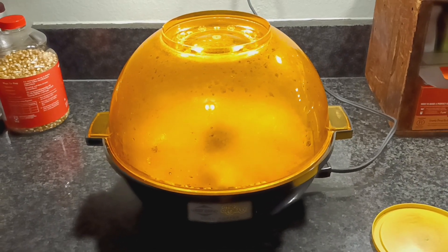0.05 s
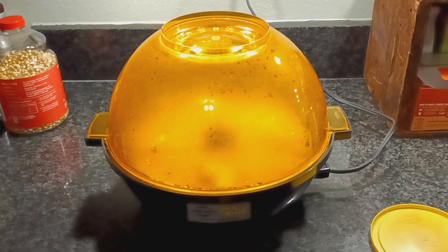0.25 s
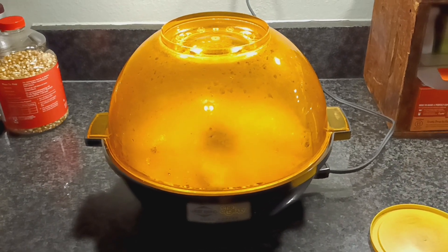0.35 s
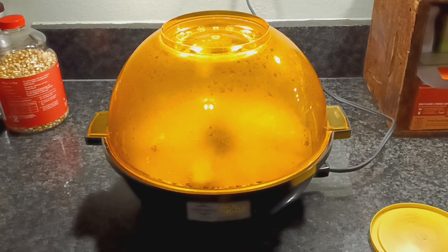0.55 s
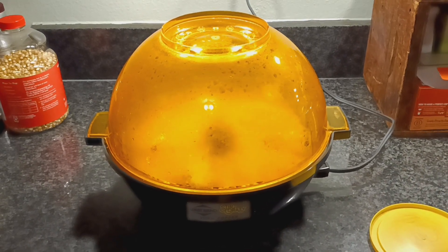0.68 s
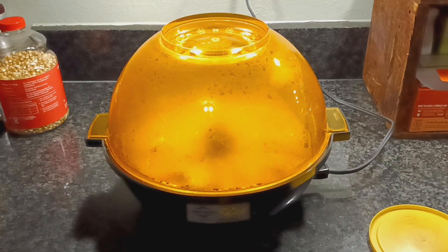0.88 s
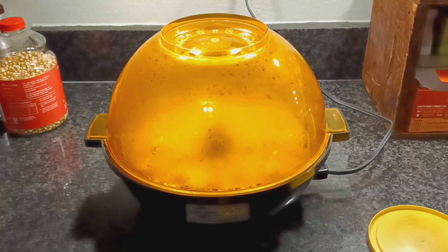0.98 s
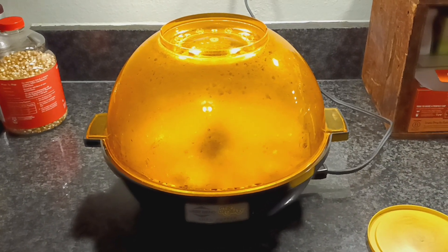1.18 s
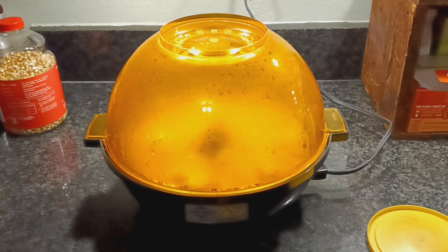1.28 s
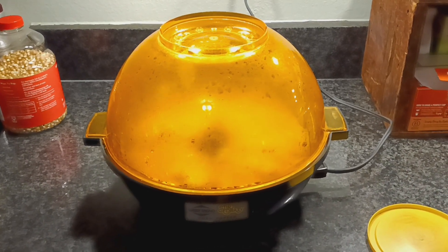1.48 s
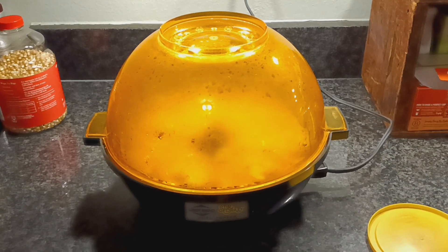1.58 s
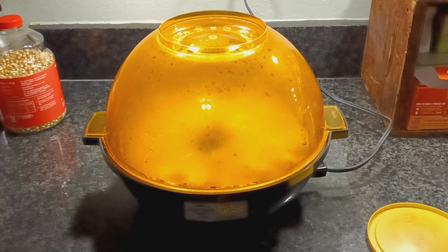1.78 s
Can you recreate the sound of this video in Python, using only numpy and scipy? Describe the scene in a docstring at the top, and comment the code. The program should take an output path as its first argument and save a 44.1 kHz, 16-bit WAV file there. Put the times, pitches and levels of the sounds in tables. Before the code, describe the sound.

Popcorn pops sharply and kernels clatter against a hollow plastic dome over a low motor hum

```python
"""Popcorn pops in an electric popper on a kitchen counter, heard close by on two unlike microphones.
Hulls burst as bright noise snaps that ring the air under the plastic dome; the kitchen answers.
Flying kernels knock the dome (noise clacks and ringing modes) and click on the hot plate.
Low noise puffs shove the ringing housing; the stirring motor rumbles and hums, and the oil hisses.
The recorder turns itself down for loud sounds and recovers slowly."""
import sys
import numpy as np
from scipy import signal
from scipy.fft import rfft, irfft
from scipy.io import wavfile
from scipy.ndimage import uniform_filter1d

SR = 44100
rng = np.random.default_rng(int(sys.argv[2]) if len(sys.argv) > 2 else 0)


def dump(signal):
    """Clip the signal to [-1, 1] and save it as 16-bit WAV at the path in sys.argv[1]."""
    limited = np.clip(np.atleast_2d(signal).T, -1, 1)
    pcm = np.round(limited * 32767).astype(np.int16)
    wavfile.write(sys.argv[1], SR, pcm)


N = 81585
TIME = np.arange(N) / SR
FFT_SIZE = 2 ** 17
FREQS = np.maximum(np.fft.rfftfreq(FFT_SIZE, 1 / SR), 1)
CUTOFF_HZ = 15800   # top of the recorded band
PIVOT_HZ = 1680     # parts the dome's low modes from its high ones

# Kernels strike the dome. Each row: start in seconds, level in dB, brightness in dB per octave,
# swell in seconds, level of the low modes in dB, level of the high modes in dB.
KNOCKS = [(0.206, -36.5, 1.5, 0.003, 4, -16), (0.377, -19.5, 3.5, 0.001, -5, -15),
          (.386, -21.5, -0.5, 0.013, 7, 5), (0.499, -25.5, -6.5, 0.0099, 6, 3.5),
          (.527, -35, -6, 0.0074, 10, 4), (0.564, -20, -1.5, 0.016, -5, -7),
          (0.611, -30.5, 14, 0.0013, -5, -10), (0.642, -12.5, 0, 0.001, 6, -8),
          (0.659, -15.5, 0, 0.018, 8, 6), (0.751, -18, -2.5, 0.0017, 9.5, -4),
          (0.781, -29, -18.5, 0.0017, -28, 4), (1.023, -20.5, 3.5, 0.002, -2, 0.5),
          (1.098, -26.5, -9, 0.009, 8, -1.5), (1.153, -31, -5, 0.0088, -10, -2),
          (1.3098, -15, 3.5, 0.0031, 8.5, 5.5), (1.373, -17, 4.5, 0.0018, -7, -4),
          (1.387, -14, -8, 0.0061, -28, 5.5), (1.431, -22, 1, 0.0017, 6, 10.5),
          (1.477, -15.5, -6, 0.00056, -20, -5), (1.544, -29.5, 3, 0.0008, 6, -11)]


def from_db(db):
    """Decibels to gain."""
    return 10 ** (np.asarray(db) / 20)


def rms_one(x):
    """Scale to rms 1."""
    return x / np.sqrt(np.mean(x ** 2) + 1e-20)


def at_hz(points):
    """Read a table along the log-frequency axis."""
    hz, value = np.transpose(points)
    return np.interp(np.log(FREQS), np.log(hz), value)


def filtered(x, response):
    """Apply a frequency response."""
    return irfft(rfft(x, FFT_SIZE) * response)[..., :N]


def colour(db):
    """Causal (minimum-phase) response with this shape; white noise keeps its level."""
    cepstrum = irfft(np.log(rms_one(from_db(db))))
    # Fold the cepstrum onto positive time, so that nothing sounds early.
    cepstrum[..., 1:FFT_SIZE // 2] *= 2
    cepstrum[..., FFT_SIZE // 2 + 1:] = 0
    return np.exp(rfft(cepstrum))


def tilt(hz, pivot_hz, slope_db):
    """Decibels gained by a slope per octave, flat below 1 kHz."""
    return slope_db * np.log2(np.maximum(hz, 1000) / pivot_hz)


def decay(start, t60):
    """Envelope that jumps to 1 and falls 60 dB in t60 seconds."""
    return (TIME >= start) * from_db(-60 * np.clip((TIME - start) / t60, 0, 3))


def swell(start, rise_s):
    """Ramp from 0 to 1."""
    return np.clip((TIME - start) / max(rise_s, 1 / SR), 0, 1)


def drift(hz):
    """Smooth random wandering of spread 1, with this many new values a second."""
    return rms_one(np.interp(TIME * hz, np.arange(N), rng.standard_normal(N)))


def diffuse():
    """Unrelated noise at each microphone."""
    return rng.standard_normal((2, N))


def paired():
    """Noise that both microphones share mostly in the bass."""
    # Each row: frequency in Hz, likeness of the two microphones from 0 to 1.
    likeness = [(50, 0.75), (250, 0.8), (600, 0.22), (1200, 0.17), (3000, .05)]
    alike = np.clip(at_hz(likeness), 0, 1)
    shared = filtered(rng.standard_normal(N), np.sqrt(alike))
    separate = filtered(diffuse(), np.sqrt(1 - alike))
    return shared + separate


def ripple(width_hz):
    """Random peaks and dips along frequency, different at each microphone; spread 1."""
    sides = [np.interp(FREQS / width_hz, np.arange(N), side) for side in diffuse()]
    return rms_one(np.array(sides))


def ring(clicks, hz, t60):
    """Each click starts a dying tone in a one-pole complex resonator."""
    pole = np.exp((2j * np.pi * hz - np.log(1000) / t60) / SR)
    return signal.lfilter([1], [1, -pole], clicks + 1e-18).real


def struck(events, modes):
    """One body rung by a series of events, the same at both microphones."""
    s, db = np.transpose(events)[:2]
    clicks = np.zeros(N)
    clicks[(s * SR).astype(int)] = from_db(db)
    return sum(from_db(mode_db) * ring(clicks, hz, t60) for hz, mode_db, t60 in modes)


def snaps(events, spectrum, t60, echo_db, room_db):
    """Each noise snap echoes raggedly under the dome and fades, duller, in the room."""
    pivot_hz, rise_s = 8000, 0.0002
    ripple_db, ripple_width_hz = 2.8, 110
    rough_db, ragged_limit = 4, 1.44   # swing of the echoes, and its largest value in spreads
    echo_t60_s, room_t60_s, room_cut_hz = 0.073, 0.35, 14000
    shape_db = at_hz(spectrum) + ripple_db * ripple(ripple_width_hz)
    walls = signal.butter(2, room_cut_hz, fs=SR, output="sos")   # the room swallows the top
    out = 0
    for s, db, slope_db in events:
        ragged = rms_one(from_db(rough_db * np.clip(drift(1000), -ragged_limit, ragged_limit)))
        fading = np.hypot(decay(s, t60), from_db(echo_db) * decay(s, echo_t60_s))
        near = diffuse() * ragged * fading
        far = signal.sosfilt(walls, diffuse()) * from_db(room_db) * decay(s, room_t60_s)
        response = colour(shape_db + tilt(FREQS, pivot_hz, slope_db))
        out = out + from_db(db) * filtered(swell(s, rise_s) * (near + far), response)
    return out


def motor():
    """The stirrer: coloured noise for the rumble, with a few tones wavering in level and phase."""
    # Rumble. Each row: frequency in Hz, level in dB.
    rumble_colour = [(28, -56), (47, -33), (90, -10), (160, -6), (215, -0.5), (350, 2), (450, -7),
                     (750, -6), (1050, -4), (1300, -8.5), (2100, -4.5), (3000, -20.5), (6000, -25),
                     (16000, -53)]
    # Tones. Each row: frequency in Hz, level in dB.
    hum_tones = [(209.9, -51.5), (352, -58.5), (1035, -56)]
    rumble_db, waver_depth, waver_hz = -39, 0.35, 5
    out = from_db(rumble_db) * filtered(paired(), colour(at_hz(rumble_colour)))
    for hz, db in hum_tones:
        waver = 1 + waver_depth * (drift(waver_hz) + 1j * drift(waver_hz))
        tone = np.real(waver * np.exp(2j * np.pi * hz * TIME))
        out = out + from_db(db) * np.sqrt(2) * tone
    return out


def sizzle():
    """Hot oil: fine hiss whose level flutters quickly, which makes it grainy."""
    # Each row: frequency in Hz, level in dB.
    hiss_colour = [(1000, 5), (3500, -3.5), (6800, -7), (8500, -1), (10300, 4), (12500, -9), (16000, -15.5)]
    level_db, rough_db, grain_hz = -42.5, 0.5, 1300
    grains = rms_one(diffuse() * from_db(rough_db * drift(grain_hz)))
    return from_db(level_db) * filtered(grains, colour(at_hz(hiss_colour)))


def plate_ticks():
    """A hard kernel clicks on the hot plate: a short snap of noise, with little room."""
    # Each row: start in seconds, level in dB, brightness in dB per octave.
    clicks = [(.205, -39, -3.5), (.583, -26, 5.5), (.608, -19.5, 0.5), (1.372, -16.5, -1),
              (1.477, -18.5, -1.5), (1.5455, -20.5, -4.5)]
    # Each row: frequency in Hz, level in dB.
    click_colour = [(60, -50), (500, -22), (1100, -1), (2500, -2.5), (5000, -0.5), (10000, -1),
                    (12000, -6.5), (16000, -26)]
    return snaps(clicks, click_colour, t60=0.037, echo_db=-0.5, room_db=-13)


def dome_clacks():
    """Each knock sets off the dome's many weak, crowded modes, which die fast and linger in the room."""
    # Each row: frequency in Hz, level in dB.
    dome_colour = [(60, -58), (250, -27), (800, -27.5), (1020, -21.5), (1200, -9), (1480, -5), (1800, -6.5),
                   (2400, -8), (3600, -10), (5000, -17.5), (7000, -21.5), (10000, -24.5), (12500, -44),
                   (16000, -55)]
    clack_db, clack_t60_s = 1, 0.089
    room_db, room_t60_s = -1, 0.32
    ripple_db, ripple_width_hz = 3.5, 45   # peaks and dips of the crowded modes
    shape_db = at_hz(dome_colour) + ripple_db * ripple(ripple_width_hz)
    out = 0
    for s, db, slope_db, rise_s, _, _ in KNOCKS:
        near = from_db(clack_db) * decay(s, clack_t60_s)
        far = from_db(room_db) * decay(s, room_t60_s)
        envelope = swell(s, rise_s) * np.hypot(near, far)
        response = colour(shape_db + tilt(FREQS, PIVOT_HZ, slope_db))
        out = out + from_db(db) * filtered(diffuse() * envelope, response)
    return out


def dome_ring():
    """The dome's strong modes swell and ring on, in new phases at each microphone for every knock."""
    # Each row: frequency in Hz, level in dB.
    dome_modes = [(1222, -7), (1297, -14), (1437, 2.5), (1470, -0.5), (1512, 3), (1577, -1), (1637, -2.5),
                  (1930, -5), (2019, -3), (2207, -0.5), (2449, 2), (2574, -8), (2776, 0), (3435, -12.5),
                  (3752, -26), (4215, -8)]
    modes_db, pivot_t60_s, t60_slope = -10.5, 0.31, 0.13
    hz, mode_db = np.transpose(dome_modes)
    t60 = pivot_t60_s * (PIVOT_HZ / hz) ** t60_slope   # high modes die sooner
    length = N // 2
    tones = np.exp(np.outer(2j * np.pi * hz - np.log(1000) / t60, TIME[:length]))
    out = np.zeros((2, 2 * N))
    for s, db, _, rise_s, low_db, high_db in KNOCKS:
        gain = from_db(db + mode_db + np.where(hz < PIVOT_HZ, low_db, high_db))
        turn = rng.standard_normal((2, len(hz)))
        weights = gain * np.exp(2j * np.pi * turn)
        start = int(s * SR)
        out[:, start:start + length] += (weights @ tones).real * swell(0, rise_s)[:length]
    return from_db(modes_db) * out[:, :N]


def pops():
    """A hull cracks: a bright snap of noise, and the air under the dome rings with it."""
    # Each row: start in seconds, level in dB, brightness in dB per octave.
    cracks = [(0.212, -37.5, 2), (.3405, -16.5, 15), (0.344, -6.5, 0), (.675, -24.5, 0), (0.7841, -19, 2),
              (.978, -10.5, 4.5), (1.296, -24, -4), (1.3115, -26, 0)]
    # Each row: frequency in Hz, level in dB.
    crack_colour = [(60, -62), (250, -48), (750, -41), (1050, -24), (1650, -11), (2600, -16.5), (3400, -5),
                    (6200, -8), (9000, 1.5), (10500, 2.5), (12500, -12), (16000, -30)]
    # Air under the dome. Each row: frequency in Hz, level in dB, time to fall 60 dB in seconds.
    air_modes = [(1034, -20, 0.25), (1658, -18, 0.42), (2234, -26, 0.42), (3250, -23.5, 0.24),
                 (4130, -23, 0.2), (4880, -19, .07)]
    snap = snaps(cracks, crack_colour, t60=0.038, echo_db=1, room_db=-6.5)
    return snap + struck(cracks, air_modes)


def thumps():
    """A burst of steam shoves the popper: a dull puff of noise, and the housing rings after it."""
    # Each row: start in seconds, level in dB.
    shoves = [(0.342, -39), (0.606, -38.5), (0.977, -32.5), (1.296, -28.5), (1.366, -25)]
    # Each row: frequency in Hz, level in dB.
    puff_colour = [(30, -48), (50, -22), (90, 1), (140, 12.5), (220, 8.5), (500, 3.5), (850, -3),
                   (1200, -28), (3000, -52)]
    # Each row: frequency in Hz, level in dB, time to fall 60 dB in seconds.
    housing_modes = [(290, -7, 0.076), (556, -11, 0.3), (813, -13.5, 0.68), (1036, -10, 1)]
    t60_s, rise_s = 0.11, 0.0031
    envelope = sum(from_db(db) * decay(s, t60_s) * swell(s, rise_s) for s, db in shoves)
    puffs = filtered(paired() * envelope, colour(at_hz(puff_colour)))
    return puffs + struck(shoves, housing_modes)


def scene():
    """Ticks, knocks, pops and thumps over the running popper."""
    running = motor() + sizzle()
    knocks = dome_clacks() + dome_ring()
    return running + plate_ticks() + knocks + pops() + thumps()


def gain_control(x):
    """The recorder looks ahead, turns down for a loud sound and recovers slowly."""
    threshold_db, range_db = -29, 6.5
    release_db_per_s, look_ahead_s = 1.5, 0.021
    power = uniform_filter1d(np.mean(x ** 2, axis=0), size=256)
    over = 10 * np.log10(np.maximum(power, 1e-12)) - threshold_db
    # The highest excess so far, sinking at the release rate.
    recovered = release_db_per_s * TIME
    held = np.maximum.accumulate(over + recovered) - recovered
    cut_db = uniform_filter1d(np.clip(held, 0, range_db), size=400)
    return x * from_db(-np.interp(TIME + look_ahead_s, TIME, cut_db))


def record(dry):
    """A dull, later left microphone and a bright right one; gain control, rounded peaks, band limits."""
    # Each row: frequency in Hz, left minus right in dB.
    mic_balance = [(60, 11.1), (1500, 10.5), (2800, 8.9), (4200, 1), (6500, 0.2), (9000, -10), (10600, -3),
                   (12500, -10), (15000, -14)]
    left_lag_s, ceiling, low_cut_hz = 0.000872, 0.95, 42
    half_db = at_hz(mic_balance) / 2
    left = from_db(half_db) * np.exp(-2j * np.pi * FREQS * left_lag_s)
    right = from_db(-half_db)
    levelled = gain_control(filtered(dry, np.array([left, right])))
    heard = ceiling * np.tanh(levelled / ceiling)
    bottom_cut = signal.butter(4, low_cut_hz, "high", fs=SR, output="sos")
    top_cut = signal.ellip(12, 0.1, 80, CUTOFF_HZ, fs=SR, output="sos")
    return signal.sosfilt(top_cut, signal.sosfilt(bottom_cut, heard))


dry = scene()
out = record(dry)
dump(out)
```